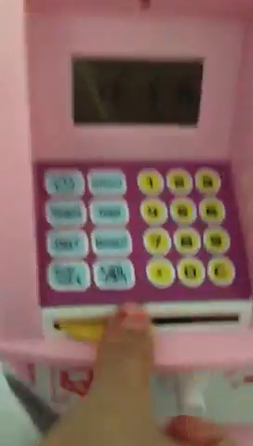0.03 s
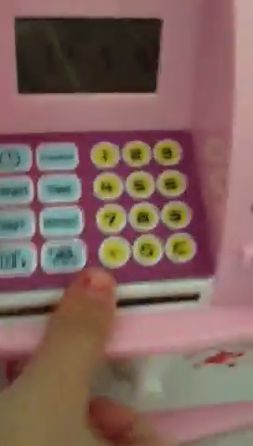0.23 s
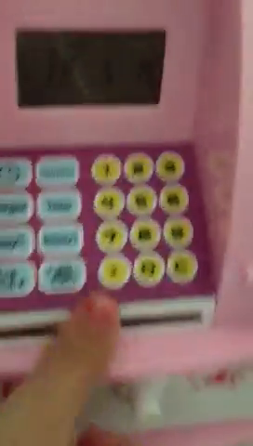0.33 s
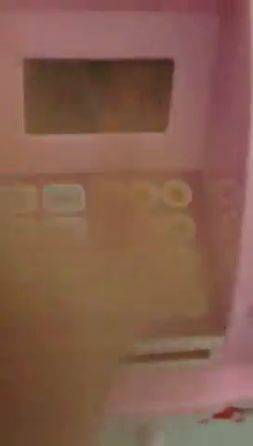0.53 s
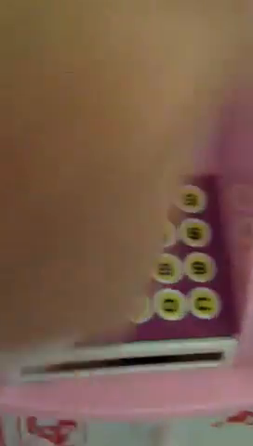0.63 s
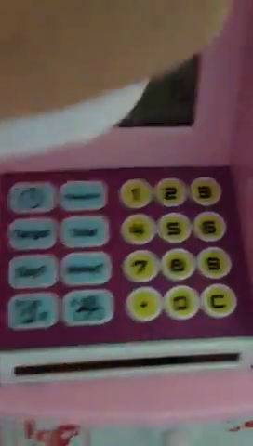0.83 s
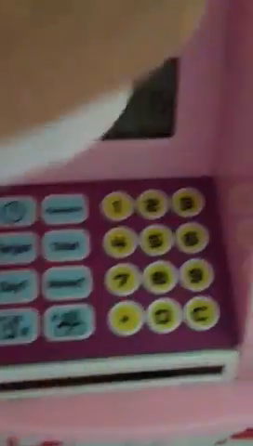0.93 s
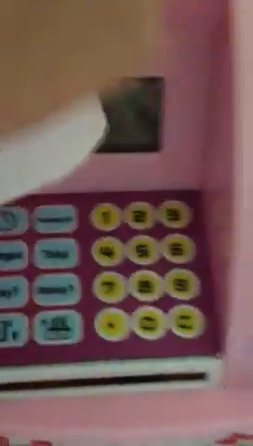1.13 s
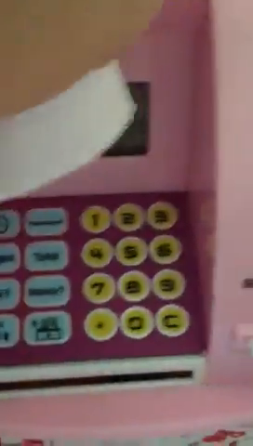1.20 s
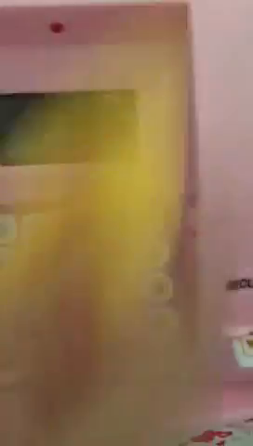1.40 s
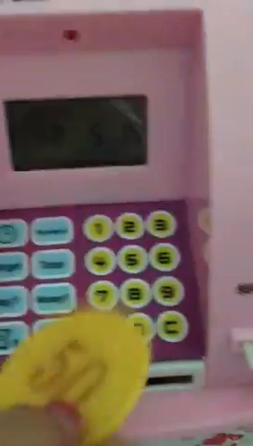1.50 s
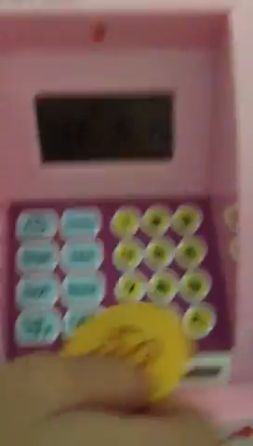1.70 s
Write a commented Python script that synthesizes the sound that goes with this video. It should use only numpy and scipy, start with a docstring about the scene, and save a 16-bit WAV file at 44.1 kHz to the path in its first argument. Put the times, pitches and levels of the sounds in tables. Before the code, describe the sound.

Sharp clatter of a plastic coin falling inside a hollow toy, followed by soft bumps.

```python
"""A small room, with quiet air, a faint hum and a soft, grainy hiss that sinks as the coin drops and
swells back afterwards. A plastic coin catches in the slot of a toy cash machine, drops inside and
clatters to rest: each strike rattles the panels, rings the hollow housing and tops up the coin's own
bright ring. Then a hand fetches the next coin, with light ticks, dull bumps, a thin swish and one
hollow knock. Every impact leaves a short room tail."""
import sys
import numpy as np
from scipy import signal
from scipy.io import wavfile
from scipy.ndimage import uniform_filter1d

SR = 44100
rng = np.random.default_rng(int(sys.argv[2]) if len(sys.argv) > 2 else 0)


def to_wav(s):
    """Save 16-bit WAV."""
    ch = np.atleast_2d(s).T  # columns
    pcm = np.round(np.clip(ch, -1, 1) * 32767)  # PCM
    wavfile.write(sys.argv[1], SR, pcm.astype(np.int16))


N = 77175

# Room tone EQ: f/Hz, level/dB
AIR_EQ = [(15, -78), (25, -48), (86, -27.5), (101, -8), (122, 1.5), (148, -9), (221, -9), (267, -9),
          (399, -6.5), (567, -20), (919, -10.5), (1270, -19), (3170, -26.5), (3630, -24.5), (4620, -29),
          (8130, -29), (10100, -40), (13500, -28), (15500, -38.5)]
# Reverb decay: f/Hz, t60/s
ROOM_DECAY = [(120, .45), (300, .55), (1000, 0.61), (4000, .42), (8000, 0.41), (14000, .29)]
# Reverb EQ: f/Hz, level/dB
ROOM_EQ = [(100, -12.5), (300, -2), (1000, -9), (4000, -4.5), (8000, -10), (14000, -13.5)]
# Background hiss fader moves: t/s, mids level/dB, treble level/dB
HISS_FADERS = [(0, -62, -65), (0.111, -56.5, -62), (.22, -69, -61), (.3, -71.5, -74.5), (.7, -72.5, -81.5),
               (1.068, -66.5, -70.5), (1.12, -56, -60), (1.3, -57.5, -62), (1.4, -66, -63.5),
               (1.501, -64.5, -64.5), (1.61, -62, -67), (1.68, -60, -62.5), (1.75, -53, -57)]
# Soft body and airy top of the hiss: f/Hz, level/dB
HISS_MIDS_EQ = [(88, -35.5), (150, -10), (318, 2), (493, -11), (574, -6), (684, -7.5), (901, -14.5),
                (983, -1.5), (1130, -10.5), (3000, -24.5), (3900, -50.5), (6600, -120)]
HISS_TREBLE_EQ = [(1470, -39), (2500, -7.5), (4750, -8.5), (5700, -2.5), (6010, -2), (7450, -1),
                  (8880, -9.5), (9800, -11.5), (13800, -9), (14800, -10.5), (15500, -17.5)]
# Light plastic ticks: t/s, level/dB, centre f/Hz
TICK_CUES = [(0.6445, -62.5, 12440), (0.725, -64, 2414), (.8422, -55, 3710), (.8465, -58.5, 3700),
             (0.9163, -56.5, 3620), (1.273, -58, 3500)]
# Bumps against the toy: t/s, level/dB, tilt/(dB per octave)
BUMP_CUES = [(1.088, -40.5, -0.5), (1.098, -36.5, -1), (1.155, -43.5, -2), (1.188, -46.5, 0.5),
             (1.228, -53, 1)]
# Their dull tone: f/Hz, level/dB
BUMP_EQ = [(24, -73), (40, -57.5), (75, -11), (178, 0), (284, -2), (320, -16), (355, -6.5), (510, -6.5),
           (663, -25), (954, -15), (2010, -33.5), (2730, -26), (5000, -32), (6500, -67), (11000, -120)]
# Their decay: f/Hz, t60/s
BUMP_DECAY = [(100, 0.15), (500, 0.2), (4000, 0.15)]
# Hollow body of the knock: f/Hz, level/dB, t60/s
KNOCK_BODY_MODES = [(482.6, 2, 0.088), (217.5, -6.5, 0.082), (285, -4.5, 0.11), (406, -3.5, 0.091),
                    (638, -7.5, 0.048), (1570, -11, 0.036)]
# The knock's snap and panel rattle: f/Hz, level/dB
SNAP_EQ = [(470, -23.5), (800, -3.5), (1080, -24), (1730, -14), (3820, -28.5), (8870, -6.5), (10200, -31),
           (13400, -13.5), (15500, -30)]
KNOCK_PANEL_EQ = [(530, -36), (900, -10), (1030, -5), (1210, -14), (1520, -7), (1790, -15.5), (2700, -18),
                  (3510, -43), (5940, -120)]
# The coin catching in the slot: t/s, level/dB, tilt/(dB per octave)
CATCH_CUES = [(.1315, -35, .5), (0.1368, -35, -2), (0.1484, -37, 2.5), (.1620, -46.5, 2.5)]
# Tone of a catch: f/Hz, level/dB
SLOT_EQ = [(47, -38.5), (80, -14), (493, -0.5), (763, -9), (1080, -2), (2490, -15.5), (2900, -8),
           (3540, -24), (3940, -12.5), (5240, -18), (6970, -12.5), (9060, -28.5), (15000, -33.5)]
# Decay of a catch: f/Hz, t60/s
SLOT_DECAY = [(300, 0.055), (2000, 0.072), (10000, .03)]
# Pitched ring of the slot: f/Hz, level/dB, t60/s
SLOT_RING_MODES = [(502, -3, 0.066), (1066, -3, .06), (1440, -8, 0.054), (2846, -11, 0.088),
                   (4720, -14, .04)]
# Coin strikes inside the toy:
# t/s, clatter level/dB, coin level/dB, housing level/dB, tilt/(dB per octave), rise/s
STRIKE_CUES = [(0.2365, -15, -18, -14.5, 0.3, 0.0011), (0.2409, -18, -17, -22.5, -0.5, 0.00079),
               (0.2466, -13.5, -15, -23.5, 2, 0.0011), (0.2488, -23.5, -11, -30.5, 3, 0.00063),
               (0.2653, -38, -34, -27.5, -0.5, .001), (0.3019, -25, -31, -25.5, -0.3, 0.0023),
               (.3100, -33, -32, -35, -1, 0.002), (0.3232, -25, -33, -25, 0.6, 0.0032),
               (0.327, -33, -26, -24.5, 0.5, 0.0011), (.3550, -38, -43, -30, -1.5, 0.0036),
               (0.3934, -32.5, -50, -28.5, -0.4, 0.0031), (.3980, -41, -42, -33.5, -0.5, 0.0041),
               (.4060, -44.5, -50, -36, -2.5, .002), (.4560, -48, -57.5, -38, -3.5, 0.002159),
               (0.471, -52.5, -57, -39.5, -3.5, 0.0024), (.4930, -53.5, -70.5, -46.5, -6.5, 0.0017)]
# Dense panel resonances: f/Hz, level/dB
CLATTER_EQ = [(35, -72), (60, -52), (285, -16), (394, -20.5), (792, -27), (889, -14), (1170, -23),
              (1350, -11.5), (1960, -24.5), (2150, -19), (3500, -22), (3840, -17.5), (4960, -20.5),
              (7200, -13.5), (8090, -10), (9080, -22.5), (10400, -27.5), (13200, -13.5), (15500, -25.5)]
# Their decay: f/Hz, t60/s
CLATTER_DECAY = [(200, 0.1), (1500, 0.062), (8000, 0.086), (15000, 0.12)]
# Hollow ring of the housing and bright ring of the coin: f/Hz, level/dB, t60/s
HOUSING_MODES = [(294.2, -23, .48), (337.7, -25, .35), (885, -18, .05), (1065, -19.5, .05),
                 (1334, -21.5, .09), (1472, -20, .07), (2446, -19, 0.073), (2990, -22, .09),
                 (3246, -22, 0.12), (3880, -20.5, 0.09), (3960, -12.5, 0.082)]
COIN_MODES = [(8342, 3, 0.048), (8200, -16, 0.035), (7940, -7, .04), (7515, -11.5, .05), (7260, -16, .07),
              (6630, -20, .09), (9255, -24.5, .05), (9400, -26, .05), (12100, -19, .04), (12950, -12, .04),
              (13400, -18, .05), (14175, -15.5, 0.042)]

AIR_DB, HUM_DB, HUM_HZ, GRAIN_DB = -63, -69.5, 120, 1.1
SWISH_S, SWISH_WIDTH_S, SWISH_HZ, SWISH_DB = 1.4816, 0.07, 5640, -63
KNOCK_S, KNOCK_BODY_DB, SNAP_DB, KNOCK_PANEL_DB = 1.627, -37.5, -37, -51.5
ATTACK_S, CLICK_DB, SLOT_RING_DB = 0.00054, 7, -3.5
RING_SEND_DB, HANDLING_SEND_DB = -9, -2.5
LOW_CUT_HZ, HIGH_CUT_HZ, CEILING = 72, 15450, 0.9


def amp(db):
    return 10 ** (np.asarray(db) / 20)


def unit_rms(x):
    return x / np.sqrt(np.mean(x ** 2) + 1e-20)


def curve_at(points, hz):
    """Read a curve along log frequency; a single point makes it flat."""
    f, value = np.transpose(points)
    return np.interp(np.log(hz + 1), np.log(f + 1), value)


def add(mix, s, sound):
    part = mix[round(s * SR):][:len(sound)]
    part += sound[:len(part)]


def band(hz, octaves):
    """EQ of one resonance, 16 dB down at `octaves` to either side."""
    return [(hz / 10, -36), (hz / 2 ** octaves, -16), (hz, 0), (hz * 2 ** octaves, -16), (hz * 10, -36)]


def colour(x, eq, tilt_db=0, size=4096):
    """Minimum-phase EQ of unit power, tilted per octave above 200 Hz."""
    hz = abs(np.fft.fftfreq(size, 1 / SR))
    slope_db = tilt_db * np.log2(np.maximum(hz, 200) / 1000)
    gain = unit_rms(amp(np.maximum(curve_at(eq, hz), -90) + slope_db))
    taps = np.fft.ifft(np.exp(np.conj(signal.hilbert(np.log(gain))))).real
    return signal.fftconvolve(x, taps[:size // 2])[:len(x)]


def noise_tail(decay, eq=((1, 0),), size=128):
    """A second of dense random ringing, each band dying at its own speed."""
    hz, t, bands = signal.stft(rng.choice([-1., 1.], SR), SR, nperseg=size)
    fade_db = curve_at(eq, hz)[:, None] - 60 * t / curve_at(decay, hz)[:, None]
    return signal.istft(bands * amp(fade_db), SR, nperseg=size)[1][:SR]


def ring(modes, scatter, detune=0):
    """Damped modes; phase (scatter, in cycles) and pitch (detune) vary with the spot that is struck."""
    t = np.arange(SR) / SR
    out = np.zeros(SR)
    for hz, db, t60 in modes:
        pitch = hz * (1 + detune * rng.uniform(-1, 1))
        envelope = amp(db) * np.minimum(hz * t, 1) * 1000 ** (-t / t60)
        out += envelope * np.sin(2 * np.pi * (pitch * t + scatter * rng.random()))
    return out


def plastic_hit(eq, decay, tilt_db=0):
    """A contact click followed by the dense ringing of plastic panels."""
    hit = noise_tail(decay) * np.minimum(np.arange(SR) / SR / ATTACK_S, 1)
    hit[0] += amp(CLICK_DB)
    return colour(hit, eq, tilt_db)


def noise_bed(eq):
    """Steady coloured noise at unit RMS."""
    return unit_rms(colour(rng.standard_normal(N + SR), eq)[SR:])


def room_tone():
    """A bed of quiet air with a faint hum."""
    t = np.arange(N) / SR
    return amp(AIR_DB) * noise_bed(AIR_EQ) + amp(HUM_DB) * np.sin(2 * np.pi * HUM_HZ * t)


def room_reverb(send):
    """The diffuse tail of a small room, building up over the first reflections."""
    t = np.arange(SR) / SR
    tail = noise_tail(ROOM_DECAY, ROOM_EQ) * np.clip((t - 0.004) / 0.016, 0, 1)
    return signal.fftconvolve(send, tail / np.sqrt(SR * 0.039))[:N]


def hiss():
    """Soft, grainy background hiss that sinks as the coin drops and swells back afterwards."""
    t = np.arange(N) / SR
    s, mids_db, treble_db = np.transpose(HISS_FADERS)
    mids = noise_bed(HISS_MIDS_EQ) * amp(np.interp(t, s, mids_db))
    treble = noise_bed(HISS_TREBLE_EQ) * amp(np.interp(t, s, treble_db))
    grain = unit_rms(uniform_filter1d(rng.standard_normal(N), size=300))
    return amp(GRAIN_DB * grain) * (mids + treble)


def swish():
    """A sleeve brushes past: a thin band of noise swells and fades."""
    t = np.arange(N) / SR
    swell = np.exp(-((t - SWISH_S) / SWISH_WIDTH_S) ** 2)
    return amp(SWISH_DB) * swell * colour(rng.standard_normal(N), band(SWISH_HZ, octaves=0.085))


def ticks():
    """Light touches on plastic, each a tight ping in one band."""
    out = np.zeros(N)
    for s, db, hz in TICK_CUES:
        add(out, s, amp(db) * plastic_hit(band(hz, octaves=0.41), decay=[(hz, 0.018)]))
    return out


def bumps():
    """Dull bumps against the toy bring out its low resonances."""
    out = np.zeros(N)
    for s, db, tilt_db in BUMP_CUES:
        add(out, s, amp(db) * plastic_hit(BUMP_EQ, BUMP_DECAY, tilt_db))
    return out


def knock():
    """One knock in three layers: hollow body, short snap and rattling panels."""
    body = amp(KNOCK_BODY_DB) * ring(KNOCK_BODY_MODES, scatter=0.98)
    snap = amp(SNAP_DB) * plastic_hit(SNAP_EQ, decay=[(1, 0.015)])
    panels = amp(KNOCK_PANEL_DB) * plastic_hit(KNOCK_PANEL_EQ, decay=[(1, 0.14)])
    out = np.zeros(N)
    add(out, KNOCK_S, body + snap + panels)
    return out


def slot_catches():
    """The coin catches on its way in; each catch clicks and rings the slot."""
    out = np.zeros(N)
    for s, db, tilt_db in CATCH_CUES:
        click = plastic_hit(SLOT_EQ, SLOT_DECAY, tilt_db)
        body = amp(SLOT_RING_DB) * ring(SLOT_RING_MODES, scatter=0.97)
        add(out, s, amp(db) * (click + body))
    return out


def coin_drop():
    """Each strike skids briefly, rattles the panels, rings the housing and feeds the coin's own ring."""
    clatter, rings, energy_in = np.zeros((3, N))
    t = np.arange(N) / SR
    for s, clatter_db, coin_db, housing_db, tilt_db, rise_s in STRIKE_CUES:
        onset = np.minimum(t[:SR] / rise_s, 1)  # the skid softens the attack
        add(clatter, s, onset * amp(clatter_db) * plastic_hit(CLATTER_EQ, CLATTER_DECAY, tilt_db))
        add(rings, s, onset * amp(housing_db) * ring(HOUSING_MODES, scatter=0.96, detune=0.01))
        add(energy_in, s, np.diff(onset, prepend=0) * amp(coin_db) ** 2)
    for hz, db, t60 in COIN_MODES:
        kept_per_sample = 1e-6 ** (1 / (t60 * SR))
        energy = signal.lfilter([1], [1, -kept_per_sample], energy_in)
        rings += amp(db) * np.sqrt(energy) * np.sin(2 * np.pi * (hz * t + rng.random()))
    return clatter, rings


def scene():
    """Mono mix: the coin up front, impacts sent to the reverb, swish and beds left dry."""
    clatter, rings = coin_drop()
    handling = slot_catches() + bumps() + ticks() + knock()
    coin_tail = room_reverb(clatter + amp(RING_SEND_DB) * rings)
    handling_tail = room_reverb(amp(HANDLING_SEND_DB) * handling)
    return (clatter + rings + handling + coin_tail + handling_tail + swish() + room_tone() + hiss())[None]


def record(dry):
    """A small microphone drops the deep bass and rounds the highest peaks; a high cut follows."""
    thinned = signal.sosfilt(signal.butter(3, LOW_CUT_HZ, "high", fs=SR, output="sos"), dry)
    rounded = thinned / (1 + (thinned / CEILING) ** 6) ** (1 / 6)
    high_cut = signal.firwin(255, HIGH_CUT_HZ, window=("kaiser", 9), fs=SR)
    return signal.oaconvolve(rounded, high_cut[None], "same")


dry = scene()
out = record(dry)
to_wav(out)
```